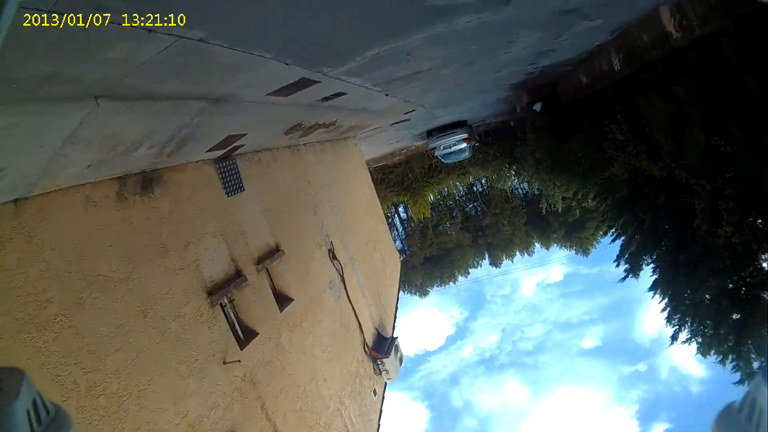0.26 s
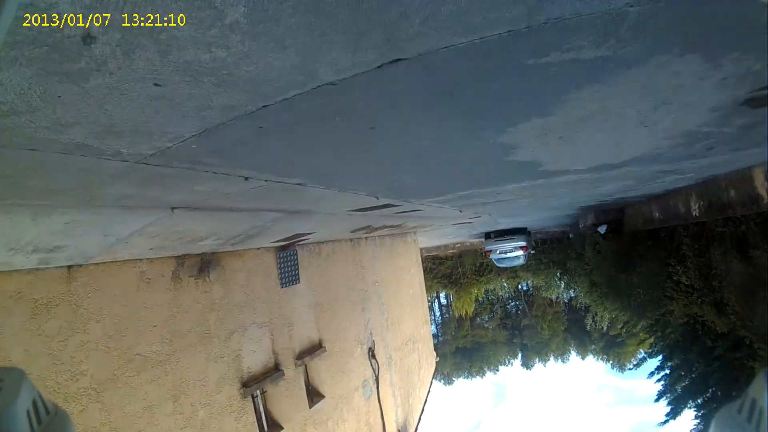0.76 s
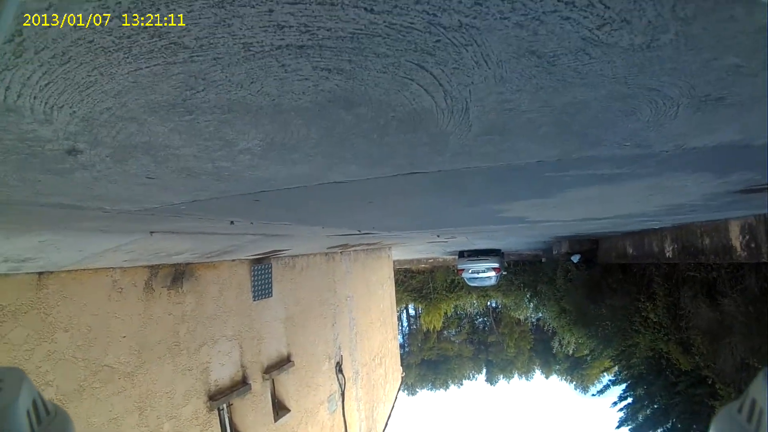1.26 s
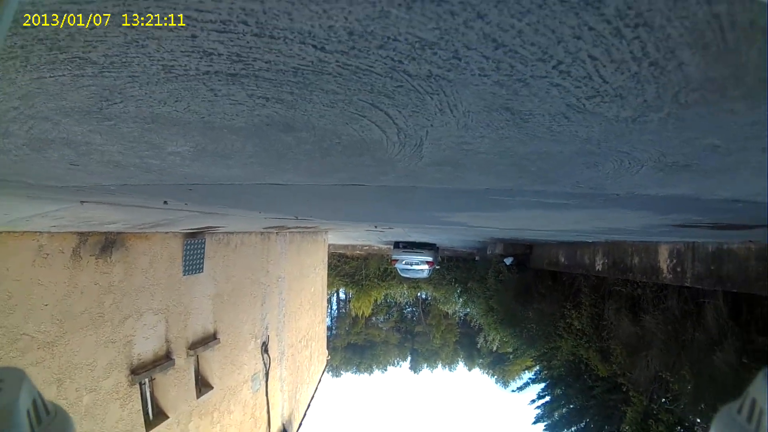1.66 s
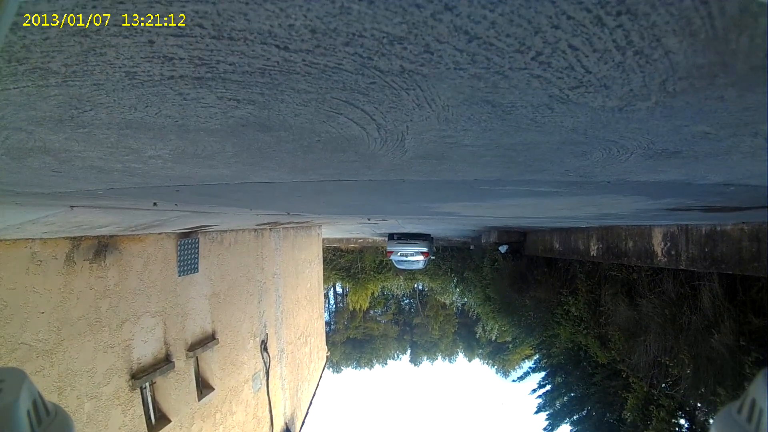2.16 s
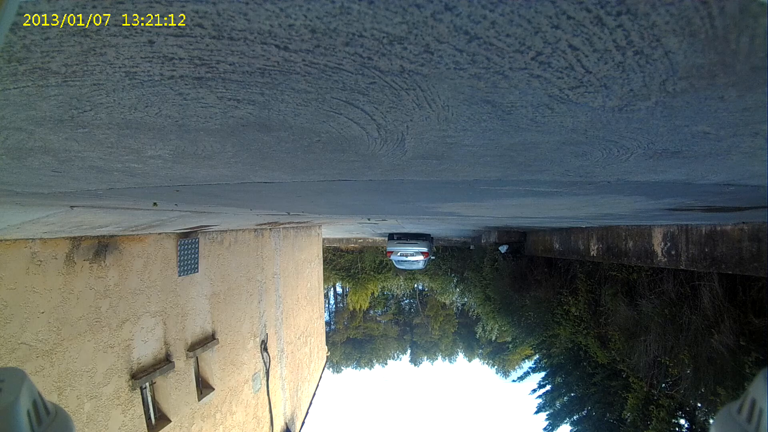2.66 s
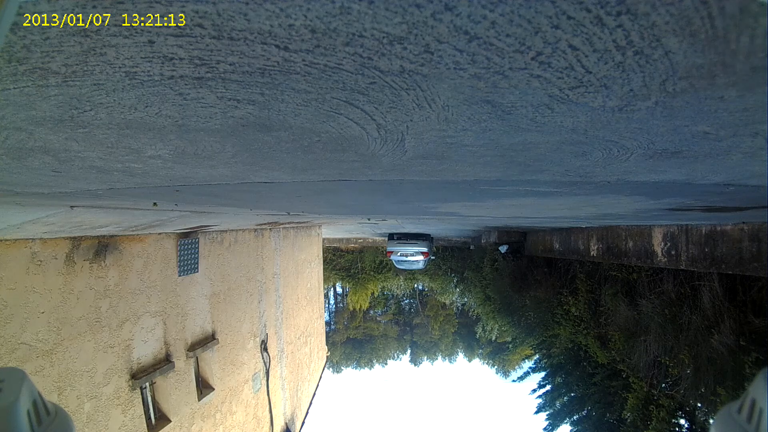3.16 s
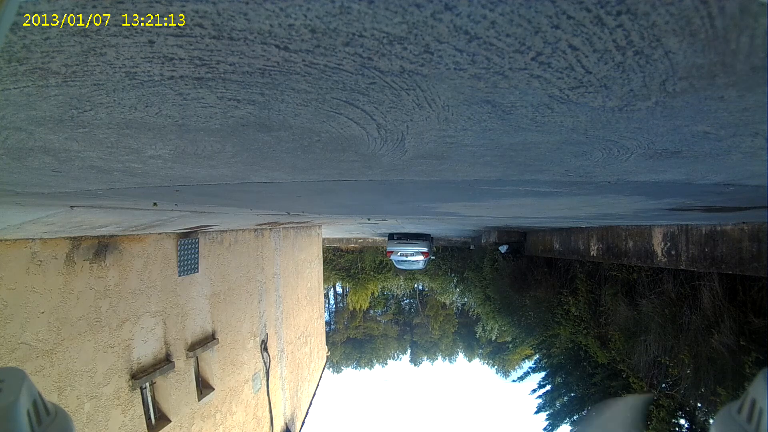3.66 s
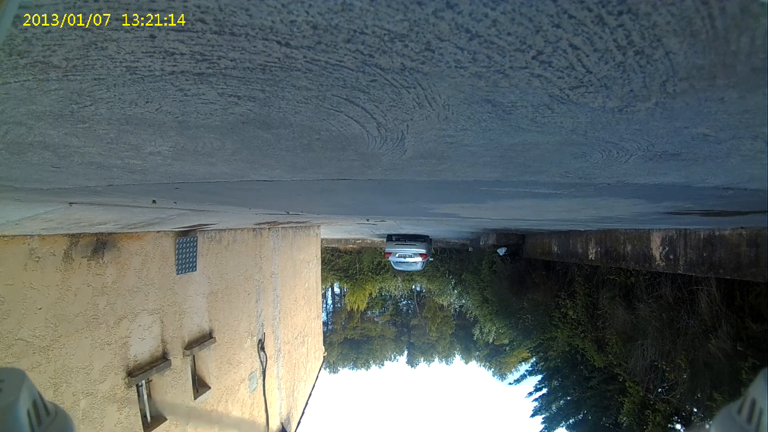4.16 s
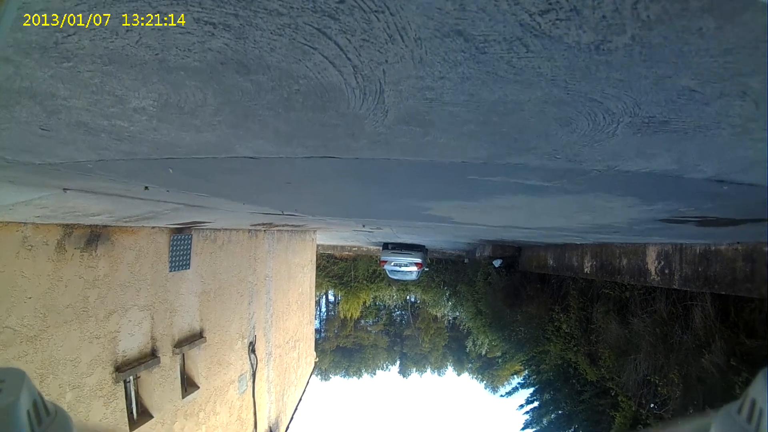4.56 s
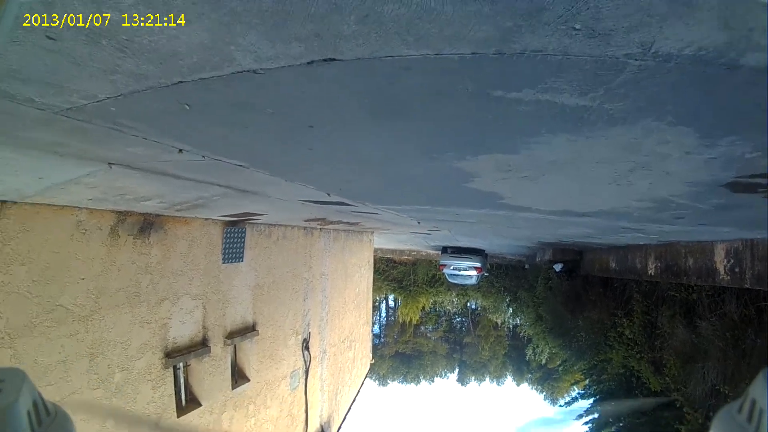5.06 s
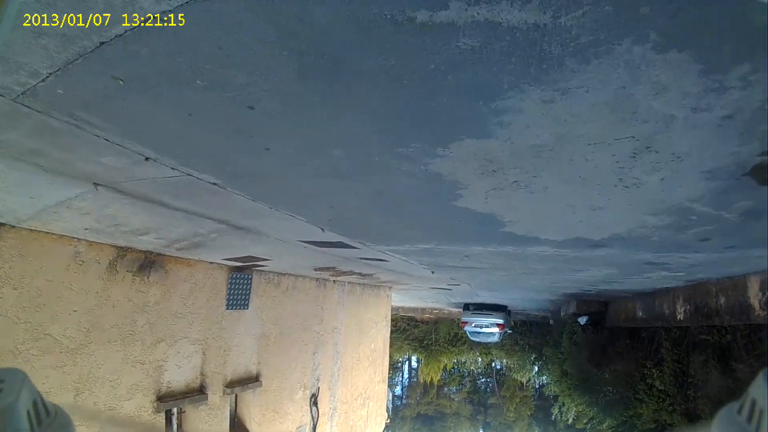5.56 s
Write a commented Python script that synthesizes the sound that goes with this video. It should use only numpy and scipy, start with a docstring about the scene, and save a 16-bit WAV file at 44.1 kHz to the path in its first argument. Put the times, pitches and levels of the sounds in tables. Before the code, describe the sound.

Soft, coloured outdoor hiss lies under everything, heard by a microphone fixed to the plastic frame of a small drone. At the very start there is a soft nudge, a faint click and light rubbing, then a single clear knock at about 0.4 s. Near quiet follows, the hiss slowly rising. From 1.54 to 1.83 s the craft is set down: a knock, then a tight, uneven clatter of short, hard plastic knocks and light taps with grainy rubbing, strongest near 1.76 s. A faint dull tick comes at 2.7 s, and slight rubs near 3.1 and 3.4 s. At about 3.45 s small clicks lead into four motors starting together. Their whine climbs steeply within half a second, then creeps higher: loud, buzzing, beating and gear-rattly, distorted by overload. The pitch swells briefly around 4.8 s, dips, and lifts slightly near 5.45 s, still running at the end.

```python
"""Four motors of a small drone spin up in a yard, after clicks, rubbing and knocks as it is set down.
Shaft whine and commutator buzz are sums of sines locked to shaft speed; gear rattle is modulated noise.
Blows excite decaying modes of the plastic frame, rubbing is grainy noise, and the yard is coloured hiss.
The microphone on the frame overloads, and the recorder narrows the band."""
import sys
import numpy as np
from scipy import signal
from scipy.fft import rfft, irfft, next_fast_len
from scipy.io import wavfile
from scipy.ndimage import uniform_filter1d

SR = 44100
rng = np.random.default_rng(int(sys.argv[2]) if len(sys.argv) > 2 else 0)


def master(y):
    """Save y as 16-bit WAV."""
    cut = np.clip(np.atleast_2d(y).T, -1, 1)
    pcm = np.round(cut * 32767)  # scale
    wavfile.write(sys.argv[1], SR, pcm.astype(np.int16))


N = 256662
T = np.arange(N) / SR
START_S = 3.458  # the motors are switched on

# Colour of gear rattle and of the crack in a blow. Each row: frequency in Hz, relative level in dB.
RATTLE_COLOUR = [(30, -14), (250, -18.5), (550, -16), (750, -3), (1000, -1.5), (1400, 5), (1700, -5),
                 (2130, 0.5), (2500, -3.5), (3120, 0), (3600, -3.5), (4600, -11.5), (7000, -27)]


def amp(db):
    """Level law: 20 dB is a tenfold amplitude."""
    return 10 ** (np.asarray(db) / 20)


def evened(x):
    """Normalisation of a signal to unit rms."""
    return x / np.sqrt(np.mean(x ** 2) + 1e-20)


def curves(rows):
    """Linear interpolation of each column of a time table, sample by sample."""
    s, *columns = np.transpose(rows)
    return [np.interp(T, s, c) for c in columns]


def gain_at(points, hz):
    """Frequency response: gain interpolated in dB over log frequency."""
    f, db = np.transpose(points)
    return amp(np.interp(np.log(hz + 1), np.log(f + 1), db))


def coloured(x, points):
    """Linear filtering: the spectrum is multiplied by a frequency response."""
    size = next_fast_len(len(x) + SR // 10)
    response = gain_at(points, np.fft.rfftfreq(size, 1 / SR))
    return irfft(rfft(x, size) * response, size)[:len(x)]


def wander(rate_hz):
    """Random modulation: noise of rms 1 under a Gaussian low-pass, without its mean."""
    hz = np.fft.rfftfreq(N, 1 / SR)
    low_pass = np.exp(-(hz / rate_hz) ** 2) * (hz > 0)
    return evened(irfft(rfft(rng.standard_normal(N)) * low_pass, N))


def add(mix, s, sound):
    """Superposition: mixes a sound in at time s."""
    part = mix[max(round(s * SR), 0):][:len(sound)]
    part += sound[:len(part)]


def rotors(surge_db=0.18):
    """Beating: four motors share one throttle at slightly different speeds; whine and rattle grow with it."""
    # Shaft speed that the throttle asks for. Each row: time in seconds, speed in Hz.
    throttle_points = [(START_S, 0), (3.5, 335), (3.575, 685), (3.65, 795), (3.79, 1020), (3.9, 1065),
                       (4.15, 1145), (4.52, 1180), (4.65, 1245), (4.97, 1175), (5.82, 1288)]
    # The motors. Each row: share of the throttle speed, drift in Hz per second as the craft trims itself,
    # share of a tilt correction, how well it shakes the microphone in dB.
    motors = [(1, 0, 1, 0), (.97, 4, .95, -3), (.945, -56, 1.2, -4), (.89, -18, -.9, -6.5)]
    whine_db, whine_growth_db = -12.3, 6  # at 1 kHz throttle speed; per tenfold speed
    whine_swell_db = .032  # per Hz of tilt correction
    rattle_db, rattle_growth_db = -5, 14  # at 1 kHz throttle speed; per tenfold speed
    attack_s = 0.027  # time that whine and rattle take to build

    throttle = curves(throttle_points)[0]
    steer = correction()
    running_s = np.maximum(T - START_S, 0)
    speeds = [np.maximum(share * throttle + drift * running_s + lean * steer, 1)
              for share, drift, lean, _ in motors]
    decades = np.log10(np.maximum(throttle, 1) / 10 ** 3)
    whine = sum(amp(row[-1]) * motor(hz) for row, hz in zip(motors, speeds))
    whine = whine * amp(whine_db + whine_growth_db * decades + whine_swell_db * steer)
    rattle = evened(coloured(sum(gears(hz) for hz in speeds), RATTLE_COLOUR))
    rattle = rattle * amp(rattle_db + rattle_growth_db * decades + surge_db * wander(40.5))
    return (whine + rattle) * np.minimum(running_s / attack_s, 1) ** 2


def motor(shaft_hz):
    """Order synthesis: imbalance, blade and commutator tones follow the shaft; the buzz grows with current."""
    # Tones as multiples of the shaft speed: two blades geared 1:6 pass at thirds,
    # the commutator buzzes at 3 and 6.
    orders = [2 / 3, 1, 4 / 3, 2, 3, 6]
    # One row per order: relative level in dB at 1 kHz shaft speed, growth in dB per tenfold speed,
    # extra level in dB under full accelerating current.
    tones = [(-9.5, 26, 0), (1.5, 28, 0), (-5.5, 18, 0), (-18, 10, 0), (-2.5, 12, 8), (-15, 10, 23)]
    # Path from the motors through the frame. Each row: frequency in Hz, gain in dB.
    frame_path = [(150, -16), (500, -6), (750, -3), (1050, -1), (1350, 1), (1700, -6), (2130, 2),
                  (2550, -7), (2900, -4), (3130, 4), (3600, -7), (4150, -5), (5000, -12), (7000, -25)]
    full_current = 2200  # scale of the acceleration, Hz per second, at which the current saturates

    unsteady_hz = shaft_hz * (1 + .004 * wander(15) + .009 * wander(200))
    turns = np.cumsum(unsteady_hz) / SR
    speeding_up = np.maximum(uniform_filter1d(np.gradient(shaft_hz) * SR, size=1500), 0)
    current = np.tanh(speeding_up / full_current)
    out = np.zeros(N)
    for k, (db, growth_db, load_db) in zip(orders, tones):
        flutter_db = 2.6 * wander(30)
        level = amp(db + growth_db * np.log10(shaft_hz / 10 ** 3) + load_db * current + flutter_db)
        tone = np.sin(2 * np.pi * (k * turns + rng.random()))
        out += level * gain_at(frame_path, k * shaft_hz) * tone
    return out


def correction():
    """Frequency modulation: each tilt correction is one smooth swell or dip of shaft speed, in Hz."""
    # Each row: middle in seconds, length in seconds, change of shaft speed in Hz.
    tilts = [(4.815, .32, 185), (4.94, .12, -30), (5.45, .14, 55)]
    return sum(hz * np.cos(np.pi * np.clip((T - s) / length, -.5, .5)) ** 2 for s, length, hz in tilts)


def gears(shaft_hz, gear_ratio=6.2, depth=0.47):
    """Amplitude modulation: loose teeth rattle as noise, harder once in each turn of the propeller."""
    prop_turns = np.cumsum(shaft_hz) / SR / gear_ratio + rng.random()
    return rng.standard_normal(N) * (1 + depth * np.cos(2 * np.pi * prop_turns))


def blows():
    """Impulsive excitation: distinct clicks and knocks on the frame."""
    # Each row: start in seconds, peak in dB, brightness in dB per octave,
    # frequency in Hz most excited at the point of contact.
    hits = [(0.081, -32.5, .5, 2800), (.38, -12, -8, 1230), (1.5427, -8, -0.5, 2170),
            (1.6006, -16, -1, 1400), (1.701, -11, -3, 2490), (1.718, -17, -2, 1400),
            (1.729, -9.5, -3, 3100), (1.737, -8, -2.5, 1400), (1.744, -6, -2, 1000),
            (1.754, -10.5, -1.5, 1350), (1.764, -2, 0, 2170), (1.776, -13.5, -1, 3500),
            (1.787, -8, -0.5, 2830), (1.825, -18.5, -2.5, 3100), (2.676, -24, -6.5, 2110),
            (3.447, -17, -2, 1500), (3.452, -15, -5, 3100), (3.47, -9.5, -5.5, 2100), (3.483, -7, -4, 3000)]
    out = np.zeros(N)
    for s, peak_db, tilt_db, centre_hz in hits:
        add(out, s, strike(peak_db, tilt_db, centre_hz))
    return out


def strike(peak_db, tilt_db, centre_hz, crack_db=-4, crack_t60=0.041, accent_db=6, contact_s=0.00042):
    """Modal synthesis: a short crack leaves the frame ringing; place and hardness of contact set its colour."""
    # Modes of the plastic frame. Each row: frequency in Hz, relative level in dB, 60 dB decay in seconds.
    modes = [(571, -15.5, 0.027), (701, -8.5, 0.038), (982, -4.5, 0.032), (1112, -17, 0.029),
             (1380, 0, 0.037), (1520, -5, 0.029), (1975, -3, 0.0074), (2100, 2, 0.019), (2730, -6.5, 0.02),
             (3070, 4, 0.017), (3720, 2, 0.011), (4410, 9.5, 0.0039)]
    t = np.arange(SR // 10) / SR
    hz, db, t60 = np.transpose(modes)[:, :, None]
    share = amp(db) * rng.choice([-1, 1], hz.shape)
    ring = (share * np.sin(2 * np.pi * hz * t) * np.exp(-np.log(1000) * t / t60)).sum(0)
    crack = evened(coloured(rng.standard_normal(len(t)), RATTLE_COLOUR))
    crack = crack * np.exp(-np.log(1000) * t / crack_t60)
    hit = coloured(ring + amp(crack_db) * crack, [(500, -2 * tilt_db), (4000, tilt_db)])
    half_octave = np.sqrt(2)
    hit = coloured(hit, [(centre_hz / half_octave, 0), (centre_hz, accent_db), (centre_hz * half_octave, 0)])
    hit = hit * (1 - np.exp(-t / contact_s))  # the plastic gives, so the blow builds over a millisecond
    return amp(peak_db) * hit / abs(hit).max()


def chatter(centre_hz=1350, spread_octaves=0.39, unevenness=0.152):
    """Repeated impact: quick, uneven runs of light taps at different spots as the feet settle."""
    # Each row: start in seconds, length in seconds, typical peak in dB, brightness in dB per octave.
    spells = [(1.613, .03, -26.5, -11.5), (1.689, .028, -23.5, -7), (1.792, .016, -19.5, -3.5)]
    gap_s, spread_db = .011, 2.5  # mean time between taps, spread in their strength
    out = np.zeros(N)
    for start, length, peak_db, tilt_db in spells:
        for s in np.arange(start, start + length, gap_s):
            late, force, spot = rng.standard_normal(3)
            tap = strike(peak_db + spread_db * force, tilt_db, centre_hz * 2 ** (spread_octaves * spot))
            add(out, s + unevenness * gap_s * late, tap)
    return out


def bump(s=0.00943, push_db=-30, push_s=0.0063):
    """Overdamped response: a soft nudge on the shell swings back once and settles without ringing."""
    u = np.maximum(T - s, 0) / push_s
    push = (T > s) * (1 - u) * np.exp(-u)
    return amp(push_db) * coloured(push, [(900, 2.0), (4000, 15.5), (7000, -42)])


def handling(grain_db=3):
    """Friction noise: fingers and feet stroke the shell with a grainy rub that swells and dies away."""
    # Each row: loudest moment in seconds, level there in dB, rise and fall over 20 dB in seconds.
    strokes = [(.088, -46.5, .02, 0.052), (.2, -54.5, 0.28, 0.6), (1.612, -37, 0.019, 0.079),
               (1.72, -38, 0.061, 0.16), (3.075, -45, 0.024, 0.063), (3.37, -42.5, 0.16, 0.088)]
    # Colour of the rubbing. Each row: frequency in Hz, relative level in dB.
    rub_colour = [(30, -33), (400, -7), (900, -7.5), (1400, 5.5), (1800, -3.5), (2130, 0), (2500, -10),
                  (3080, 5), (3500, -9), (4700, -11), (7000, -34)]
    grains = rng.standard_normal(N) * amp(grain_db * wander(170))
    rub = evened(coloured(grains, rub_colour))
    swell = sum(amp(db - 20 * np.maximum((s - T) / rise, (T - s) / fall)) for s, db, rise, fall in strokes)
    return rub * swell


def yard(lift_db=1):
    """Filtered random noise: soft outdoor hiss, coloured by the microphone's housing, slowly rises."""
    # Level of the background before the lift. Each row: time in seconds, level in dB.
    level_points = [(0, -59), (.9, -57.5), (1.4, -53), (3.4, -48.5)]
    # Colour of the background. Each row: frequency in Hz, relative density in dB per Hz.
    hiss_colour = [(15, -43), (25, -27), (64, -14), (163, -24), (252, -17.5), (500, -19), (534, -12),
                   (680, -13.5), (1030, -2), (1290, -4), (1750, -14.5), (3040, -22), (4830, -39),
                   (6280, -83), (10600, -120)]
    swell_db = .3 * wander(12)
    hiss = evened(coloured(rng.standard_normal(N), hiss_colour))
    return amp(curves(level_points)[0] + lift_db + swell_db) * hiss


def scene():
    """Superposition of everything that reaches the one microphone."""
    return (rotors() + blows() + chatter() + bump() + handling() + yard())[None]


def record(dry, ceiling=0.48, hiss_db=-84):
    """Saturation and band limiting: the microphone stage clips; the recorder dulls the treble and hisses."""
    # Response of the recorder after the overload. Each row: frequency in Hz, gain in dB.
    recorder_response = [(20, -1.5), (3100, 0.5), (3900, -7.5), (4700, -10.5), (5500, -21.5), (6200, -32.5),
                         (7050, -26.5), (7600, -32.5), (8000, -41), (8400, -29.5), (9300, -18),
                         (11000, -13.5), (15500, -19)]
    knee = 8  # sharpness of the overload
    edge_hz = 15750  # upper limit of the band
    clipped = dry[0] / (1 + abs(dry[0] / ceiling) ** knee) ** (1 / knee)
    hiss = coloured(rng.standard_normal(N), [(6500, -13), (8000, -18), (9300, 1), (15000, 6)])
    stored = coloured(clipped, recorder_response) + amp(hiss_db) * hiss
    low_pass = signal.firwin(1023, edge_hz, window=("kaiser", 9), fs=SR)
    return signal.oaconvolve(stored, low_pass, "same")[None]


dry = scene()
out = record(dry)
master(out)
```